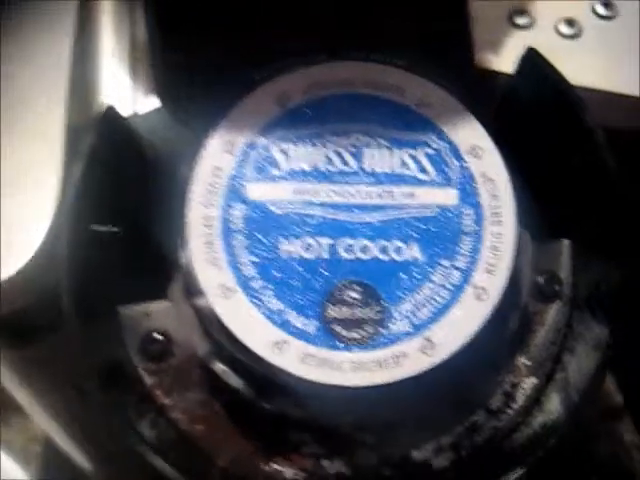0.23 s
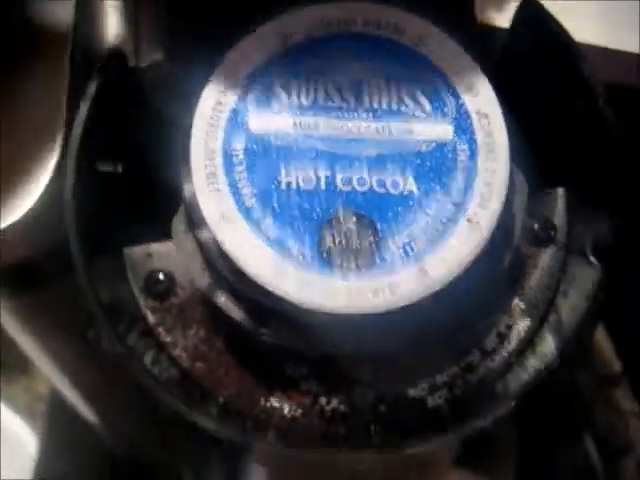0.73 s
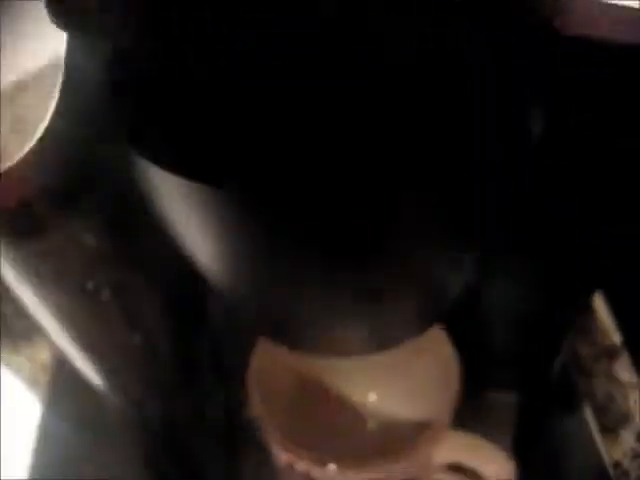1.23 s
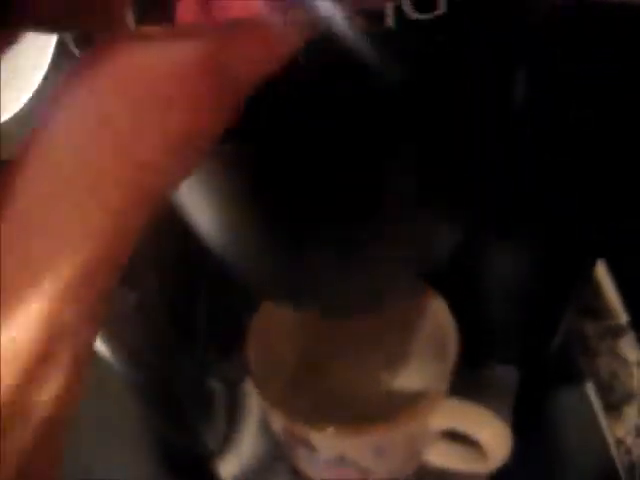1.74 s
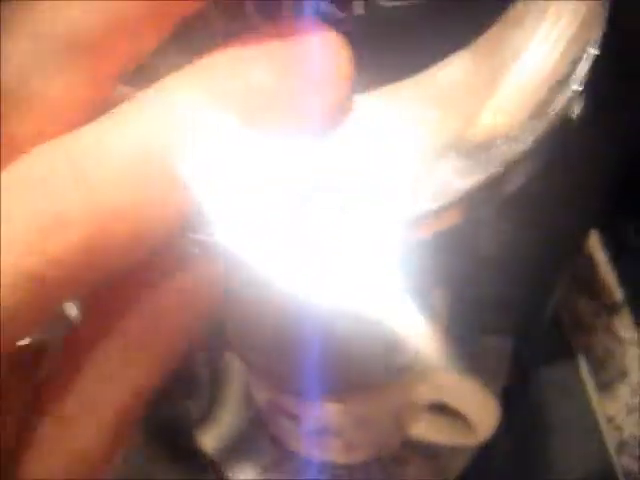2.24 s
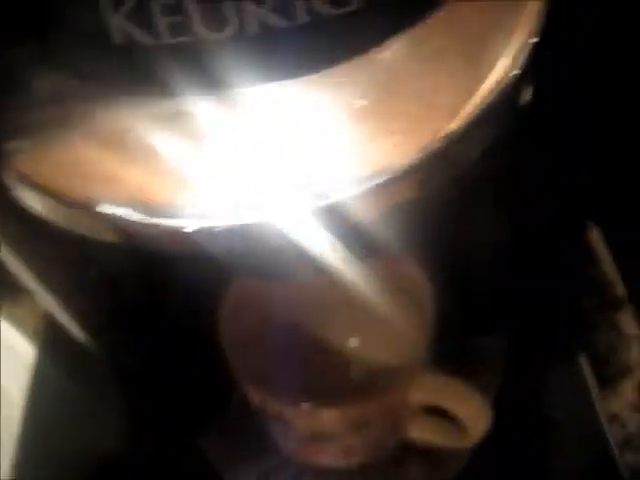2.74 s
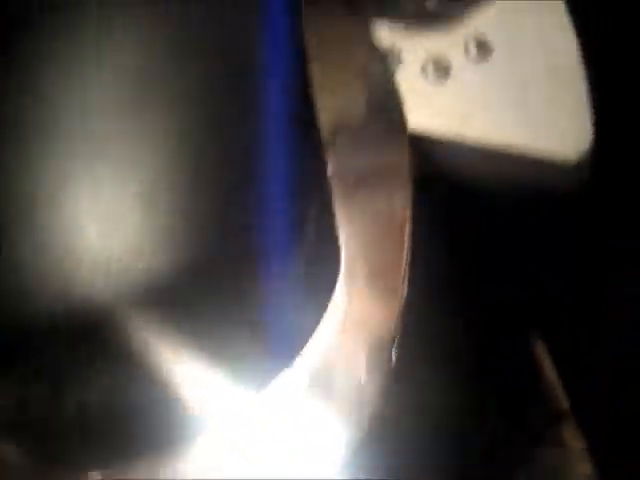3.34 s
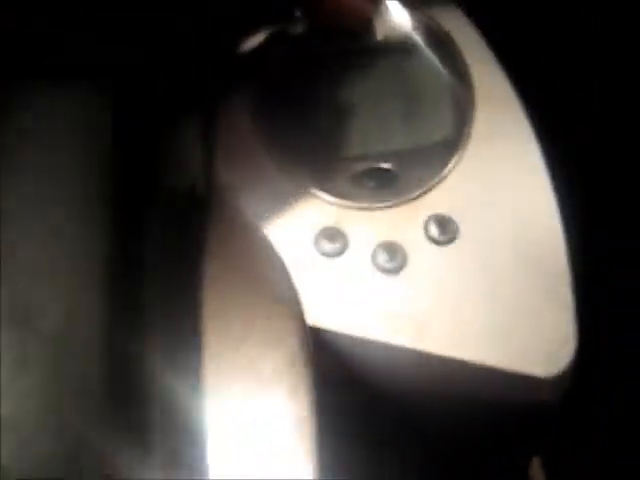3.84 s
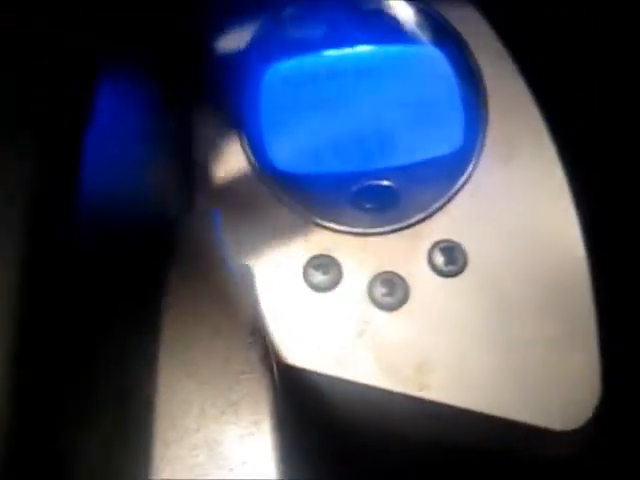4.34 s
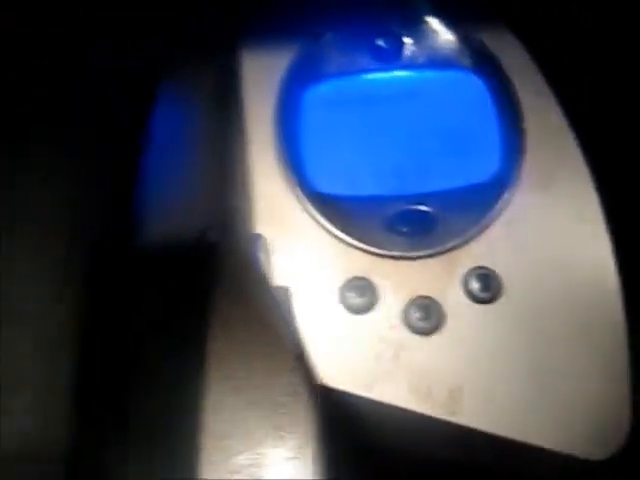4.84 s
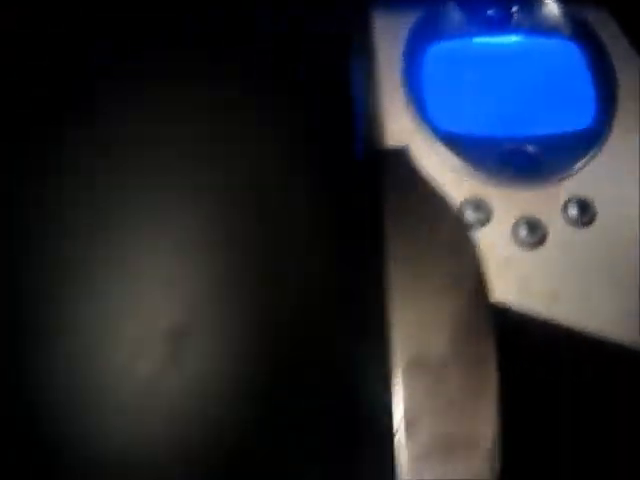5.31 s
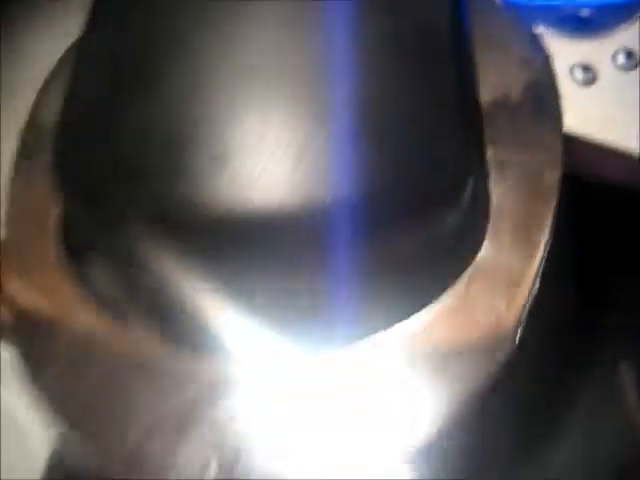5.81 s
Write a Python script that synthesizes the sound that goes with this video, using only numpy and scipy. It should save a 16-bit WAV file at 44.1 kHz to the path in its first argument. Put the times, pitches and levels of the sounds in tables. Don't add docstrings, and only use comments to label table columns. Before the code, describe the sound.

In a quiet kitchen, a small, thin-sounding microphone close by catches plastic taps and a sharp crack, then bright scraping as a coffee maker lid swings down. Fast ratchety knocks lead to a latch snap with thin steel ringing, followed by two hard handle slams. Light scuffs fade, a cluster of dry housing creaks follows, then one loud final snap buzzes away. Sparse ticks remain over hiss and a faint high whine.

```python
import sys
import numpy as np
from scipy import signal
from scipy.fft import rfft, irfft
from scipy.io import wavfile
from scipy.ndimage import uniform_filter1d

SR = 44100
rng = np.random.default_rng(int(sys.argv[2]) if len(sys.argv) > 2 else 0)


def put_to_file(sound):
    columns = np.atleast_2d(sound).T
    safe = np.clip(columns, -1, 1)
    whole_steps = np.round(safe * 32767)
    wavfile.write(sys.argv[1], SR, whole_steps.astype(np.int16))


def magnitude_from_level(level_db):
    exponent = np.asarray(level_db, float) / 20
    return 10 ** exponent


N = 267598


def evened(x):
    return x / np.sqrt(np.mean(x ** 2) + 1e-20)


def peaked(x):
    return x / np.max(abs(x))


def add(mix, s, sound):
    part = mix[round(s * SR):][:len(sound)]
    part += sound[:len(part)]


def coloured(x, points):
    f, db = np.transpose(points)
    hz = np.fft.rfftfreq(len(x), 1 / SR)
    gain = magnitude_from_level(np.interp(np.log(hz + 1), np.log(f + 1), db))
    return evened(irfft(rfft(x) * gain, len(x)))


def resonate(x, hz, width):
    r = np.exp(-np.pi * width / SR)
    poles = [1, -2 * r * np.cos(2 * np.pi * hz / SR), r * r]
    return evened(signal.sosfilt([[1, 0, 0, *poles], [1, 0, -1, *poles]], x))


def ring(modes, t, phases=0):
    hz, db, t60 = np.transpose(modes)[:, :, None]
    return (magnitude_from_level(db - 60 * t / t60) * np.sin(2 * np.pi * hz * t + phases)).sum(0)


def fading(t, t60, rise):
    return magnitude_from_level(-60 * t / t60) * (1 - np.exp(-t / rise))


# (f/Hz, level/dB, t60/s)
LID_MODES = [(850, -3.5, 0.09), (1180, 4.5, 0.055), (1470, 21, 0.0094), (1803, 5, 0.056), (2140, -6, 0.11),
             (2450, -4.5, 0.075), (2900, -23, 0.018)]
# (f/Hz, level/dB per Hz)
CRACK_SPECTRUM = [(1470, -28), (2500, -28), (3750, 5.5), (4890, -7), (5830, 0.5), (11100, -19.5),
                  (15500, -50)]
# (f/Hz, level/dB per Hz)
BODY_RUMBLE = [(35, -75), (60, -44), (211, -3), (314, 3), (456, 0), (670, 2.5), (900, -4.5), (1170, -18),
               (1980, -120)]


def knock(db, hz, crack_db, thud_db, t60, noise, luck):
    t = np.arange(len(noise[0])) / SR
    panel = ring([(hz, 0, 0.61 * t60), (1.463 * hz, -5, 0.29 * t60), (0.83 * hz, -8, 0.13 * t60)], t)
    near = []
    for (f, level, mode_t60), u, v in zip(LID_MODES, luck[0], luck[1]):
        octaves_off = abs(np.log2(f / hz))
        near.append((f * (1 + 0.16 * (u - .5)), level - 3.7 * octaves_off - 2.7 * v, mode_t60 * t60 / 0.15))
    lid = ring(near, t, 2 * np.pi * luck[2][:, None])
    rattle = coloured(noise[2], [(300, -40), (0.5 * hz, -6), (hz, 0), (1.7 * hz, -6), (5500, -30)])
    rattle = rattle * magnitude_from_level(-60 * t / (1.94 * t60))
    body = (panel + magnitude_from_level(-5.0) * lid + magnitude_from_level(-20.0) * rattle) * (1 - np.exp(-t / 0.0015))
    crack = coloured(noise[0], CRACK_SPECTRUM) * fading(t, 0.59 * t60, 0.000067)
    thud = coloured(noise[1], BODY_RUMBLE) * fading(t, 2.0 * t60, 0.000097)
    blow = peaked(body) + magnitude_from_level(crack_db + 2.5) * peaked(crack) + magnitude_from_level(thud_db) * peaked(thud)
    return magnitude_from_level(db + 0.5) * blow


# (t/s, peak level/dB, panel f/Hz, crack level/dB re peak, ring t60/s)
CRISP_BLOWS = [(0.105, -3.5, 817, -22, 0.01), (0.164, -16.5, 1700, -9, 0.0084),
               (0.3749, -1, 1610, -16.5, 0.019), (0.513, -27, 1880, -12, 0.026),
               (0.72, -14.5, 890, -13, 0.089), (0.966, -18, 1590, -13, 0.16),
               (1.238, -18, 1465, -11, 0.059), (1.269, -10.5, 2120, -18, 0.03),
               (1.294, -2.5, 2080, -25, 0.029), (1.339, 1, 1287, -6.5, 0.022),
               (1.383, -7, 2055, -16, 0.045), (1.442, -20, 2140, 2, 0.04), (1.659, -4.5, 1498, -1.5, 0.045),
               (1.802, -16.5, 1400, -21, 0.052), (1.974, -7, 1210, -14, 0.078), (2.01, -2, 1180, -9, 0.03),
               (2.158, -20, 2190, -31.5, 0.09), (2.269, -19, 2300, -7.5, 0.11),
               (2.471, -18, 1270, -19, 0.048), (3.146, -31.5, 2190, -6, 0.014),
               (3.886, -14.5, 1940, -17, 0.03), (3.989, 4.5, 1238, -10, 0.022),
               (4.259, -31, 1900, -6, 0.036), (4.8335, -27, 800, -9, 0.03)]
# (t/s, peak level/dB, panel f/Hz, thud level/dB re peak, ring t60/s)
BLUNT_TOUCHES = [(0.073, -27, 1010, -3, 0.01), (.155, -38, 1000, 7.5, 0.058),
                 (0.173, -22.5, 920, -26, 0.011), (0.216, -35, 990, -6, 0.01), (.239, -15, 1144, -36, 0.02),
                 (1.3208, -4, 2290, -15.5, 0.026), (1.344, -12, 1300, -30, 0.035),
                 (1.472, -2.5, 2370, -60, 0.011), (1.492, -2.5, 1980, -60, 0.022),
                 (1.5568, -2, 1870, -63, 0.027), (1.588, -29, 3520, -25, 0.041),
                 (1.611, -14.5, 1460, -14, 0.072), (1.891, -38, 400, 5, 0.016),
                 (1.968, -29, 1310, -6, 0.011), (2.093, -25, 1180, -2, 0.06),
                 (3.091, -36, 1015, -13, 0.086), (3.4575, -43, 850, -8, 0.0071),
                 (3.962, -26, 950, -6, 0.06), (3.927, -39, 1300, -6, 0.055), (4.226, -26, 480, -5.5, 0.043),
                 (4.905, -36, 990, -5, 0.028), (5.179, -40, 1030, -15, 0.02)]
THUD_DB, THUD_GROWTH = -27, 0.29
BLUNT_CRACK_DB = -23.5


def knocks():
    rows = []
    for s, db, hz, crack_db, t60 in CRISP_BLOWS:
        rows.append((s, db, hz, crack_db, THUD_DB - (1 - THUD_GROWTH) * db, t60))
    for s, db, hz, thud_db, t60 in BLUNT_TOUCHES:
        rows.append((s, db, hz, BLUNT_CRACK_DB, thud_db, t60))
    out = np.zeros(N)
    noises = rng.standard_normal((len(rows), 3, 6144))
    lucks = rng.random((len(rows), 3, len(LID_MODES)))
    for (s, *how), noise, luck in zip(rows, noises, lucks):
        add(out, s + 0.000821, knock(*how, noise, luck))
    return out


# (t/s, peak level/dB, f/Hz, t60/s)
PART_PINGS = [(0.1064, 1.5, 1910, 0.0061), (0.375, -3, 2665, 0.015), (0.3757, -14, 3100, 0.014),
              (0.3754, -20, 4420, 0.016), (0.7238, -5.5, 2650, 0.026), (0.7692, -12, 2230, .02),
              (.7872, -9, 4010, 0.014), (0.802, -9, 3150, .01), (0.8495, -15, 3120, 0.025),
              (1.2698, -36, 3220, .03), (1.295, -7, 1300, 0.031), (1.322, -22, 3220, .03),
              (1.3398, 2, 2200, 0.018), (1.385, -17, 2540, .05), (1.473, -16, 3860, 0.018),
              (1.4915, 1, 2140, 0.014), (1.492, -22, 3950, 0.022), (1.5575, -9, 3570, 0.023),
              (1.968, -18, 1390, 0.017), (2.012, -21, 2910, 0.065), (.3752, -10, 2015, 0.026),
              (.3752, -12.5, 3360, 0.0098), (.73, -23, 932, 0.086), (.7872, -14.5, 950, 0.041),
              (.7872, -13.5, 2200, 0.031), (.8033, -0.5, 4250, 0.0075), (.8033, -9, 5960, .006),
              (.845, -12, 1020, 0.055), (.906, -19.5, 878, 0.092), (.9675, -17, 2480, 0.031),
              (.9675, -25, 4220, .03), (1.167, -4, 5900, 0.022), (1.169, -11, 6500, 0.015),
              (4.8335, -29, 2600, 0.017), (4.8733, -20, 6500, 0.0055), (5.1632, -18, 6750, .006),
              (5.5365, -16, 4400, 0.0051), (2.05, -20, 4080, 0.018), (2.056, -18, 4050, 0.017),
              (2.159, -24, 2180, .06), (3.4582, -5.5, 875, 0.0052), (3.888, -22, 1050, 0.05),
              (3.953, -31, 319, 0.09), (3.953, -25, 2410, .04), (3.9525, -12, 4600, 0.012),
              (3.99, -3.5, 1897, 0.04)]
# (t/s, peak level/dB, f/Hz, t60/s)
HANDLE_SLAMS = [(1.9747, 5, 1087, 0.022), (1.9746, -4, 3780, .01), (1.9746, -10, 4600, 0.0081),
                (1.9748, -4, 2110, .02), (2.0101, 6, 1130, 0.017), (2.0101, 1, 3490, 0.01),
                (2.0098, 0.5, 2590, 0.013), (2.0101, -4.5, 5220, 0.012), (2.01, 2.5, 1700, 0.019),
                (4.834, -13, 1390, 0.0068), (1.9754, -7, 1700, .025), (2.003, -21, 1100, .03),
                (1.9752, -12, 2960, .015)]
# (t/s, peak level/dB, f/Hz, t60/s)
STEEL_RINGS = [(1.661, -35, 587, 0.8), (1.662, -26, 2384, 0.52), (1.66, -42, 4740, 0.6),
               (1.663, -32, 4100, .3), (1.661, -28.5, 2300, 0.55), (1.66, -35, 5070, 0.49),
               (1.661, -43, 5370, .3), (1.662, -29, 1824, 0.32), (3.992, -32, 783, 0.54),
               (3.992, -31, 1100, 0.38), (3.99, -25.5, 1297, 0.38), (3.992, -27.5, 1475, 0.49),
               (3.992, -34, 2000, 0.46), (3.992, -33, 2000, 0.36), (3.992, -46, 3570, 0.46),
               (3.992, -41, 4020, 0.56), (3.992, -45, 4344, 0.67)]
# (t/s, peak level/dB, f/Hz, t60/s)
SHORT_PINGS = [(.1062, -12, 3240, .008), (.1085, -16.5, 480, 0.029), (.2402, -14, 2300, .006),
               (.2402, -21, 3950, .006), (.384, -28, 850, 0.037), (.7195, -18, 1300, .02),
               (.774, -16, 4300, .012), (.809, -12, 3100, .02), (.869, -16, 6800, .015),
               (1.6598, -8.5, 5940, .02), (1.662, -10.5, 4100, 0.021), (1.667, -14, 2300, .04),
               (1.668, -20, 6700, 0.018), (1.672, -15, 1600, .03), (2.064, -20, 1400, .03),
               (2.074, -23, 750, 0.034), (2.168, -19, 2250, .025), (2.192, -22, 1300, .03),
               (2.7885, -24, 4000, .02), (3.892, -18, 2010, .02), (3.899, -22, 2150, .02),
               (3.9925, -12, 3620, .02), (4.002, -14, 1500, .025), (4.012, -20, 1800, .025),
               (4.113, -29, 1300, 0.11), (1.5525, -18, 2200, .04), (1.4885, -15, 2000, .02),
               (1.3362, -12, 2000, .015), (1.4322, -11, 5300, .005), (1.468, -12, 2100, .008),
               (2.5275, -22, 5800, .012), (3.9895, -8, 10500, .006)]
PING_RISE_S, FLUTTER_DB = .00025, 4


def pings():
    out, t = np.zeros(N), np.arange(SR // 2) / SR
    rows = PART_PINGS + HANDLE_SLAMS + STEEL_RINGS + SHORT_PINGS
    shakes = rng.standard_normal((len(rows), 64))
    for (s, db, hz, t60), shake in zip(rows, shakes):
        shake = shake - shake[0] * (t60 < .1)
        wander = np.interp(t, np.linspace(0, t[-1], len(shake)), shake)
        flutter = magnitude_from_level(FLUTTER_DB * wander * np.clip(t60 / .1, 0, 1))
        add(out, s, flutter * ring([(hz, db, t60)], t) * (1 - np.exp(-t / PING_RISE_S)))
    return out


# (f/Hz, level/dB per Hz)
SCUFF_HISS = [(1500, -14), (2500, 0.5), (4000, 0.5), (7000, -0.5), (10000, -13), (13000, -22), (16000, -49)]
# (t/s, peak
# level/dB, centre f/Hz, body level/dB re peak, t60/s)
BRIGHT_SCUFFS = [(0.528, -20, 3800, 6.5, 0.081), (0.563, -27, 5930, 2, 0.059), (0.7225, 1, 4230, -14, 0.026),
                 (0.7665, -12.5, 4430, 1.5, 0.12), (0.7876, -14, 4100, 4.5, 0.057),
                 (0.802, -6, 3250, -3, 0.028), (1.1233, -12, 3900, 3, 0.059), (1.158, -4, 5200, -14, 0.06),
                 (1.1683, 5.5, 4200, -9.5, 0.024), (1.197, -17, 5610, -23, 0.11),
                 (1.4125, -19, 7000, -18, 0.034), (1.4303, -12, 5460, -29, 0.025), (1.47, -10, 7600, -9, 0.15),
                 (1.491, -3.5, 2960, -34, 0.019), (1.535, -18, 3360, -17, 0.072),
                 (1.5575, -5.5, 3950, 9, 0.022), (1.7903, -20.5, 5400, -15, 0.028),
                 (2.048, -12, 4100, -16, 0.016), (2.0537, -16, 3960, 2.5, 0.16),
                 (2.096, -8.5, 4080, -9, 0.086), (2.167, -14, 6450, -2, 0.022),
                 (2.1805, -14, 5400, 5, 0.056), (2.225, -20, 6730, -19, 0.055),
                 (2.2792, -13, 5600, 2, 0.05), (2.5315, -13, 4100, -1, 0.05),
                 (2.781, -15.5, 4200, -34, 0.2), (3.952, -1.5, 4470, -3.5, 0.05),
                 (4.043, -18.5, 4170, -23, 0.089), (4.126, -20, 4370, -3, 0.035),
                 (4.2254, -19, 6000, -14, 0.019)]


def scuffs():
    out, t = np.zeros(N), np.arange(4096) / SR
    rise = 0.0015
    rows = BRIGHT_SCUFFS
    noise = rng.standard_normal((len(rows), 2, len(t)))
    for (s, db, hz, body_db, t60), (contact, shaking) in zip(rows, noise):
        bright = coloured(contact, SCUFF_HISS) + 0.53 * resonate(contact, hz, 1400)
        body = coloured(shaking, [(400, -15.5), (900, 1.0), (1300, 7.0), (2200, 2.5), (3200, -32)])
        shape = np.clip(t / rise, 0, 1) ** 2 * magnitude_from_level(-60 * np.maximum(t - rise, 0) / t60)
        add(out, s, magnitude_from_level(db - 5.0) * (peaked(bright * shape) + magnitude_from_level(body_db) * peaked(body * shape)))
    return out


def slide(start, end, from_db, to_db, hiss_db,
          hollow_hz, hollow_db, centre_hz, centre_db, tilt_db, rumble_hz, rumble_db):
    t = np.arange(start - .006, end + 0.0077, 1 / SR)
    smooth, luck = rng.standard_normal((3, SR // 2)), rng.random((3, SR // 2))
    size = np.minimum((1 - luck[0]) ** -.35, 2.4)
    slips = size * (luck[1] < 3000 / SR) * np.sign(luck[2] - .5)
    judder = magnitude_from_level(2. * evened(uniform_filter1d(uniform_filter1d(smooth[2], 250), 250)))
    drive = evened(evened(slips) + smooth[0]) * judder

    lid = signal.oaconvolve(drive, ring(LID_MODES, np.arange(4096) / SR))[:len(drive)]
    wide = coloured(drive, [(500, -10), (900, 7.5), (1500, 9.5), (2300, 10.5), (5000, -33)])
    hollow = resonate(drive, hollow_hz, 220)
    body = magnitude_from_level(hollow_db) * hollow + .5 * evened(lid) + 0.54 * wide

    hiss = coloured(drive, [(1600, -23.0), (3000, -3), (6000, tilt_db),
                            (12000, 4.23 * tilt_db - 6.5), (16000, 3 * tilt_db - 36)])
    hiss = hiss + magnitude_from_level(centre_db) * resonate(drive, centre_hz, 1600)
    shaking = smooth[1] * judder
    rumble = coloured(shaking, BODY_RUMBLE) + 0.5 * resonate(shaking, rumble_hz, 53)

    contact = evened(body) + magnitude_from_level(hiss_db) * evened(hiss) + magnitude_from_level(rumble_db) * evened(rumble)
    pressure = magnitude_from_level(np.interp(t, [start, end], [from_db, to_db]))
    ends = np.clip(np.minimum(t - t[0], t[-1] - t) / 0.0035, 0, 1)
    return t[0], pressure * contact[:len(t)] * ends


# (start t/s, end t/s, pressure level/dB at start, at end, hiss level/dB re pressure)
POD_STROKES = [
    (.076, .101, -42, -44, -21),
    (.118, .19, -43, -55, -26),
    (.535, .6, -30.5, -43, -8),
    (.6, .712, -44.5, -48, -9),
]
LID_STROKES = [
    (.74, .76, -20, -41, -8.5),
    (.76, .8, -29, -30, 4),
    (.8, .9, -24.5, -25.5, 3),
    (.9, .975, -21.5, -25, -3),
]
HINGE_STROKES = [
    (1.132, 1.2, -25.5, -38, 1.5),
    (1.2, 1.262, -37.5, -37, -0.5),
    (1.675, 1.76, -26.5, -43, -5),
    (1.76, 1.95, -49, -50, -5.5),
]
RATCHET_STROKES = [
    (1.278, 1.355, -38.5, -40, -7.5),
    (1.355, 1.428, -34.5, -35, -8),
    (1.436, 1.505, -36.5, -35.5, 1.5),
    (1.52, 1.6, -31.5, -35.5, -9.5),
    (1.6, 1.655, -36, -43.5, -5.5),
    (3.905, 3.945, -40, -40, -27),
    (4.235, 4.3, -37, -57, -8),
]
HANDLE_STROKES = [
    (2.025, 2.088, -32.5, -30.5, -22),
    (2.098, 2.2, -25.5, -32.5, -7.5),
    (2.2, 2.35, -32.5, -45.5, -9.5),
]
CASE_STROKES = [
    (2.45, 2.52, -51.5, -53, -6),
    (2.52, 2.62, -46.5, -60.5, -7),
    (2.62, 2.775, -65, -55.5, -7),
]
CHROME_STROKES = [
    (2.795, 2.82, -46.5, -59, 19.4),
    (2.82, 2.885, -45, -47.5, 12),
    (2.896, 2.955, -42, -49, 7),
    (5.3, 5.45, -70, -64, 14.4),
    (5.45, 5.68, -64, -74, 15),
]
LATCH_STROKES = [
    (.985, 1.118, -29.5, -37.5, -1.5),
    (4.008, 4.09, -31, -31.5, -12),
    (4.09, 4.215, -35.5, -53, -8),
]


def slides():
    surfaces = [
        (POD_STROKES, dict(hollow_hz=890, hollow_db=5, centre_hz=4440, centre_db=-16,
                           tilt_db=-3.0, rumble_hz=348, rumble_db=-4.0)),
        (LID_STROKES, dict(hollow_hz=990, hollow_db=-3.5, centre_hz=4260, centre_db=-10.5,
                           tilt_db=-5.5, rumble_hz=256, rumble_db=-12.5)),
        (HINGE_STROKES, dict(hollow_hz=1580, hollow_db=-17, centre_hz=4250, centre_db=-19,
                             tilt_db=-7.5, rumble_hz=645, rumble_db=-6.0)),
        (LATCH_STROKES, dict(hollow_hz=1290, hollow_db=-14, centre_hz=4230, centre_db=-19.0,
                             tilt_db=-5.5, rumble_hz=710, rumble_db=-17.0)),
        (RATCHET_STROKES, dict(hollow_hz=1900, hollow_db=-6, centre_hz=3700, centre_db=-15,
                               tilt_db=-4, rumble_hz=460, rumble_db=-17.0)),
        (HANDLE_STROKES, dict(hollow_hz=1180, hollow_db=-13, centre_hz=3900, centre_db=-19,
                              tilt_db=-3.5, rumble_hz=220, rumble_db=-2.5)),
        (CASE_STROKES, dict(hollow_hz=1300, hollow_db=-8.0, centre_hz=5750, centre_db=-1.0,
                            tilt_db=-9, rumble_hz=217, rumble_db=10)),
        (CHROME_STROKES, dict(hollow_hz=2300, hollow_db=-6.0, centre_hz=6500, centre_db=-33,
                              tilt_db=-1.0, rumble_hz=386, rumble_db=-16))]
    out = np.zeros(N)
    for strokes, colour in surfaces:
        for stroke in strokes:
            add(out, *slide(*stroke, **colour))
    return out


# (f/Hz, level/dB, t60/s)
SPRING_MODES = [(651, 0, .4), (2180, -1, .37), (2315, -10, .6), (2902, -6, .33), (3402, -3, .3),
                (3898, -7, .38), (4274, -7, .27), (4850, -7, .4), (5028, -6, .33), (5556, -10, .35),
                (5809, -12, .35)]
# (t/s, level/dB)
SPRING_TWANGS = [
    (1.661, -28),
    (3.99, -44),
]


def spring():
    out, t = np.zeros(N), np.arange(SR // 2) / SR
    for s, db in SPRING_TWANGS:
        phases = 2 * np.pi * rng.random((len(SPRING_MODES), 1))
        add(out, s, magnitude_from_level(db) * ring(SPRING_MODES, t, phases))
    return out


# (t/s, rms level/dB, centre f/Hz, width f/Hz, t60/s)
STEEL_BUZZES = [
    (1.664, -31.5, 5300, 1300, 0.33),
    (1.664, -31, 3700, 1200, .35),
    (1.68, -33, 1400, 500, .3),
    (4.0, -40, 4000, 700, .5),
    (4.0, -35, 2090, 700, .5),
    (4.09, -39, 1200, 700, .3),
]


def buzzes():
    out, t = np.zeros(N), np.arange(SR // 2) / SR
    noises = rng.standard_normal((len(STEEL_BUZZES), len(t)))
    for (s, db, hz, width, t60), noise in zip(STEEL_BUZZES, noises):
        add(out, s, magnitude_from_level(db) * resonate(noise, hz, width) * fading(t, t60, .004))
    return out


# (t/s, peak level/dB, f/Hz, t60/s, climb in Hz a second)
HOLLOW_BOOMS = [
    (1.004, -32, 324, 0.44, 64),
    (1.124, -22.5, 565.5, 0.26, 1898),
    (2.093, -13.5, 234, 0.054, -200),
]


def booms():
    out, t = np.zeros(N), np.arange(SR // 4) / SR
    for s, db, hz, t60, climb in HOLLOW_BOOMS:
        tone = np.sin(2 * np.pi * (hz + climb * t / 2) * t)
        add(out, s, magnitude_from_level(db) * fading(t, t60, 0.0015) * tone)
    return out


# (f/Hz, level/dB, t60/s)
HOUSING_MODES = [(220, 2.5, 0.011), (402.7, 5, 0.055), (640, -4, 0.045), (805, -4, 0.044),
                 (700, -28, 0.022), (1360, -3, 0.018)]
# (t/s, peak level/dB, tick level/dB re peak, dry snap level/dB re ring)
GRIP_CREAKS = [(0.242, -7.5, -1.5, -7), (3.2597, -13.5, 1, -27), (3.292, -13.5, -5.5, -19),
               (3.306, -14, -4.5, -11), (3.3336, -14, -2.5, -18), (3.4002, -12, -3, -14),
               (3.442, -16, -0.5, -18), (3.4662, -11, -4, -13), (3.4808, -12.5, -5, -14),
               (3.4952, -12.5, -3.5, -17), (3.5087, -13, -8, -13), (3.536, -11, -12, -8),
               (3.5679, -9.5, -5, -13), (3.6, -11, -4, -12), (3.613, -30, 4, -5), (3.6936, -12.5, 0, -26),
               (3.7131, -17, -2, -20), (3.744, -12.5, -1, -15), (4.8744, -15.5, 3.5, -15),
               (5.164, -14.5, 4.3, -20), (5.5379, -13, 5.5, -24)]
SNAP_HZ, SNAP_S, SNAP_LAG_S = 694, 0.0016, 0.0013
DETUNE = 0.013


def creaks():
    out, t = np.zeros(N), np.arange(4096) / SR
    noises = rng.standard_normal((len(GRIP_CREAKS), 4096))
    lucks = rng.standard_normal((len(GRIP_CREAKS), len(HOUSING_MODES)))
    load = .0015
    for (s, db, tick_db, snap_db), noise, luck in zip(GRIP_CREAKS, noises, lucks):
        modes = []
        for (f, level, t60), v, u in zip(HOUSING_MODES, luck, luck[::-1]):
            modes.append((f * (1 + DETUNE * u * f / 400), level + v, t60))
        push = ring(modes, abs(t - load), np.pi / 2) * np.clip(t / load, 0, 1) ** 2
        flex = np.exp(-((t - load - SNAP_LAG_S) / SNAP_S) ** 2)
        snap = np.cos(2 * np.pi * SNAP_HZ * (t - load)) * flex
        push = peaked(push) + magnitude_from_level(snap_db) * snap
        tick = coloured(noise, [(900, 4.5), (1700, -1.0), (2400, 3.5), (3500, -8.0),
                                (5500, -9.5), (8000, -14.0), (15000, -41)])
        tick = tick * (fading(t, 0.0065, 0.00094) + 0.05 * fading(t, 0.038, 0.0018))
        add(out, s - load, magnitude_from_level(db + 0.5) * peaked(push) + magnitude_from_level(db + tick_db - 2.0) * peaked(tick))
    return out


# (t/s, level/dB, t60/s)
LOW_THUMPS = [
    (2.012, -16, 0.0047),
    (3.9898, -18, 0.0093),
]


def thumps():
    out, t = np.zeros(N), np.arange(2048) / SR
    for s, db, t60 in LOW_THUMPS:
        add(out, s, magnitude_from_level(db) * peaked(fading(t, t60, 0.001)))
    return out


def scene():
    near = knocks() + pings() + scuffs() + slides() + spring() + buzzes() + booms() + creaks()
    bass_cut = signal.butter(2, 130, "high", fs=SR, output="sos")
    return (signal.sosfilt(bass_cut, near) + thumps())[None]


# (f/Hz, level/dB per Hz)
ROOM_AND_HISS = [(25, -27), (48, 2), (76, -18), (120, -3), (160, -8), (210, -5), (400, -6), (1000, -7),
                 (2500, -11.5), (6500, -14.5), (8600, -18), (10300, -8), (12000, -21), (15800, -18.5)]
# (f/Hz, rms level/dB)
HUM_AND_WHINE = [
    (48.4, -64),
    (7560, -56.5),
]
FLOOR_DB = -44.5


def background():
    t = np.arange(N) / SR
    waver = magnitude_from_level(.5 * evened(uniform_filter1d(rng.standard_normal(N), 6000)))
    turned = magnitude_from_level(np.interp(t, [.5, 5.22, 5.35], [-4, 1, -6]))
    lines = np.zeros(N)
    for hz, db in HUM_AND_WHINE:
        lines += np.sqrt(2) * magnitude_from_level(db) * np.sin(2 * np.pi * (hz * t + rng.random()))
    floor = magnitude_from_level(FLOOR_DB - 1.5) * coloured(rng.standard_normal(N), ROOM_AND_HISS)
    return floor + waver * turned * lines


def band_limit(x):
    return signal.sosfilt(signal.butter(12, 16060, fs=SR, output="sos"), x)


START = .0735


def record(dry):
    power_db = 10 * np.log10(abs(uniform_filter1d(dry[0] ** 2, 400)) + 1e-12)
    fall = np.arange(N) * 90 / SR
    held_db = np.maximum.accumulate(power_db + fall) - fall
    over_db = np.maximum(held_db + 17.0, 0)
    mix = dry + background() / magnitude_from_level(.35 * uniform_filter1d(over_db, 200))
    mix = np.clip(mix, -.97, .97) * (np.arange(N) > START * SR)
    roll_off = signal.butter(4, 14500, fs=SR, output="sos")
    mix = signal.sosfilt(roll_off, mix)
    return band_limit(mix)


dry = scene()
out = record(dry)
put_to_file(out)
```